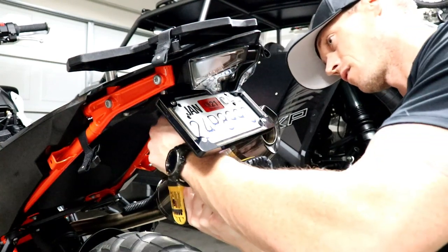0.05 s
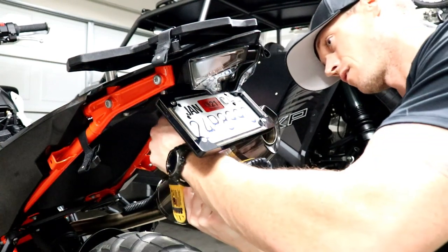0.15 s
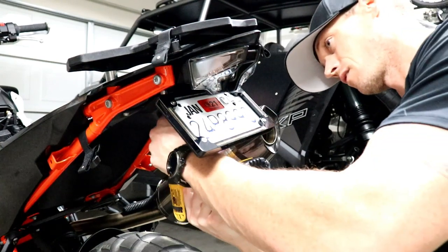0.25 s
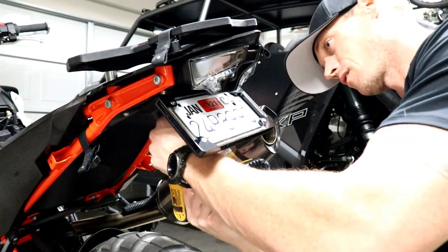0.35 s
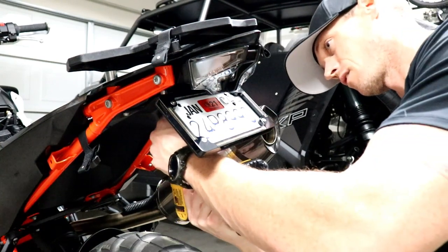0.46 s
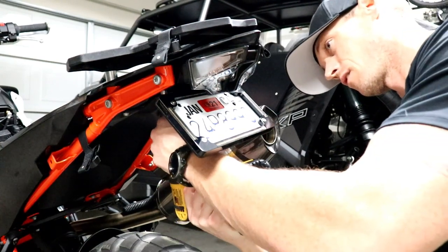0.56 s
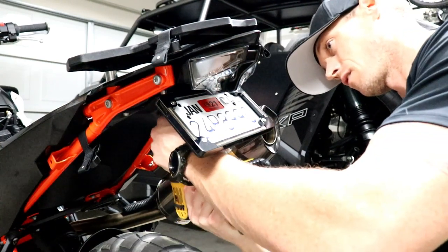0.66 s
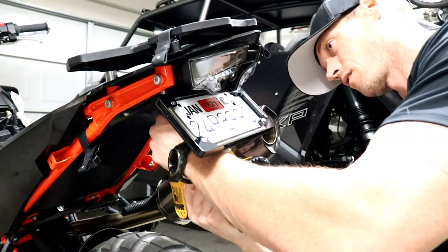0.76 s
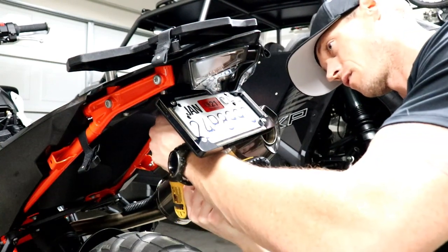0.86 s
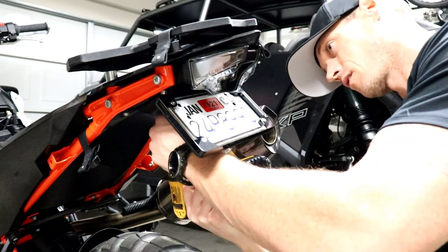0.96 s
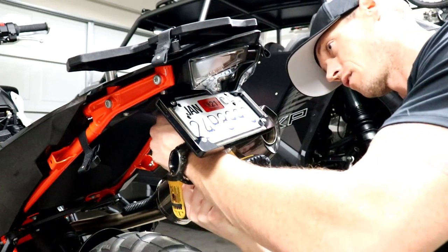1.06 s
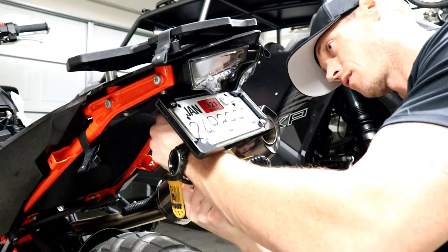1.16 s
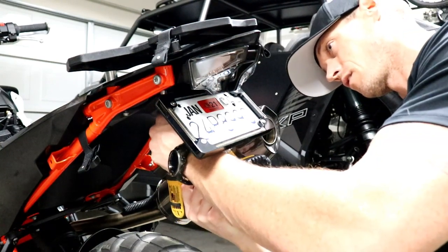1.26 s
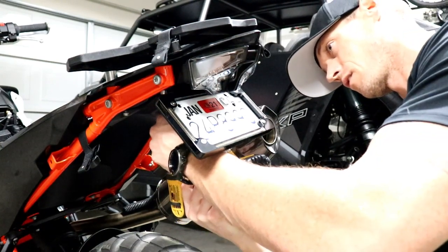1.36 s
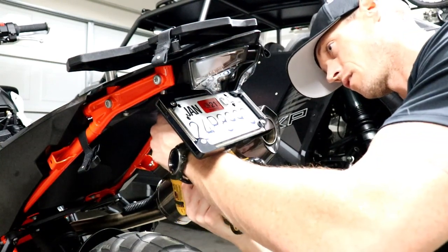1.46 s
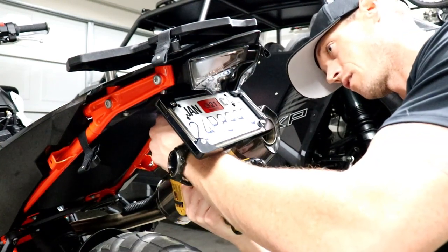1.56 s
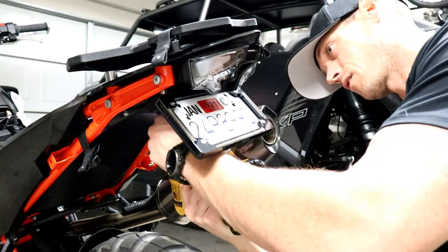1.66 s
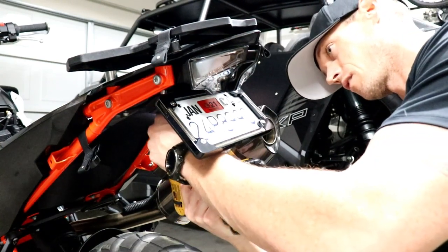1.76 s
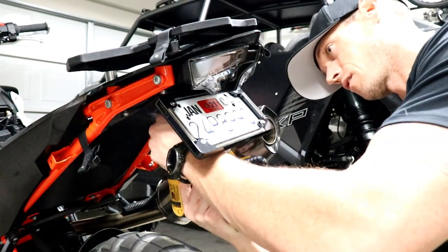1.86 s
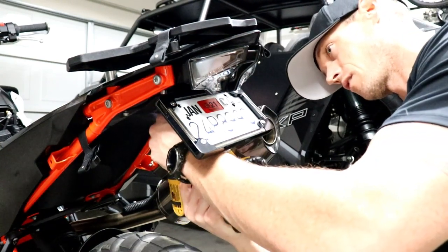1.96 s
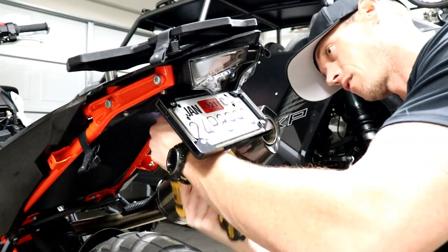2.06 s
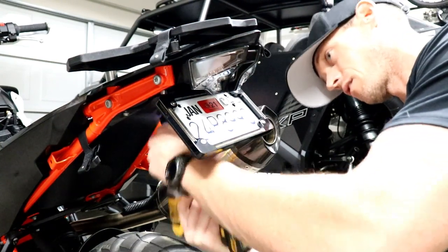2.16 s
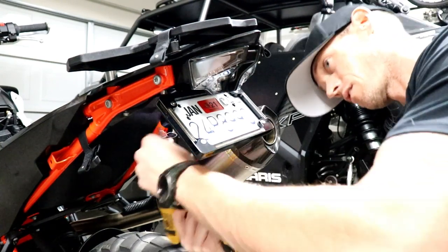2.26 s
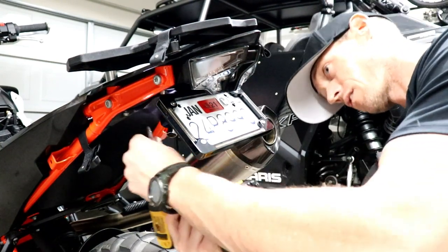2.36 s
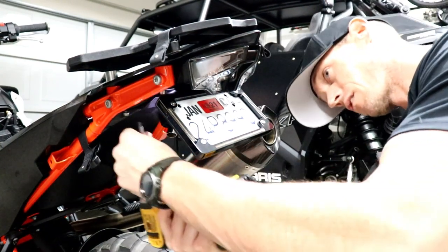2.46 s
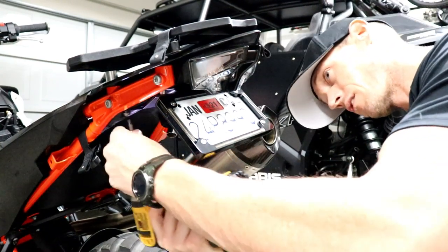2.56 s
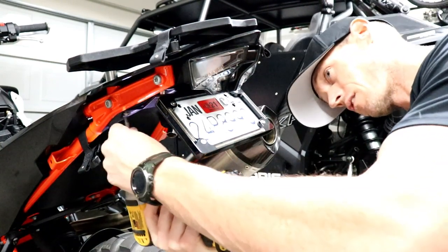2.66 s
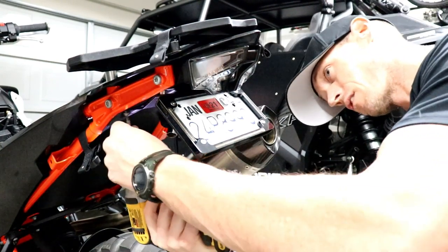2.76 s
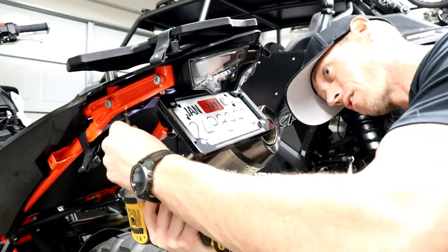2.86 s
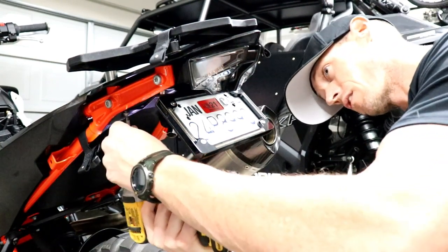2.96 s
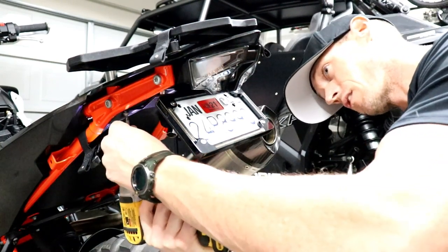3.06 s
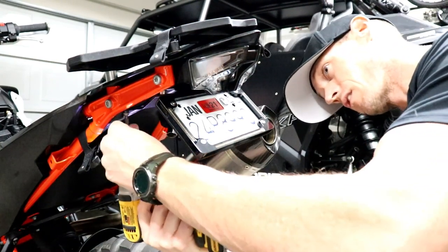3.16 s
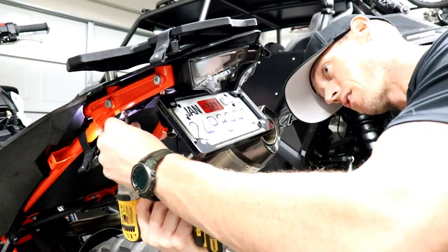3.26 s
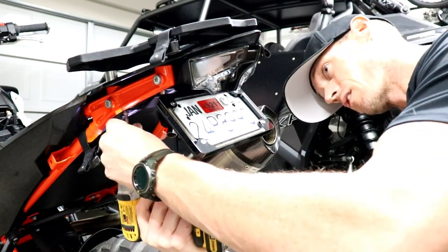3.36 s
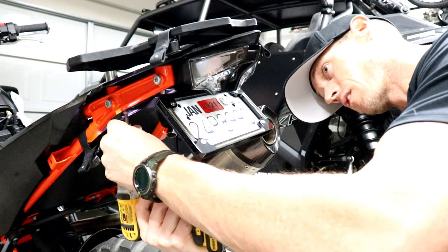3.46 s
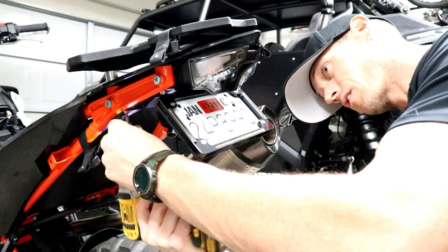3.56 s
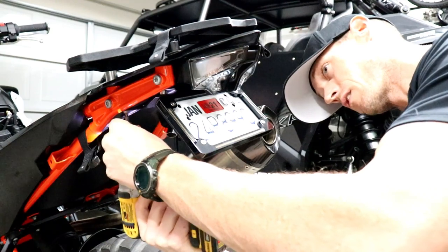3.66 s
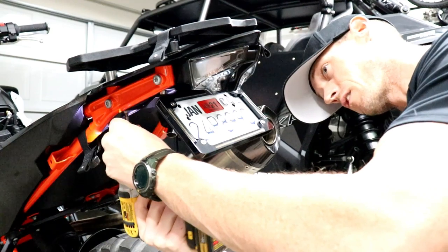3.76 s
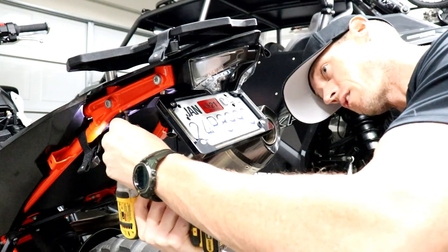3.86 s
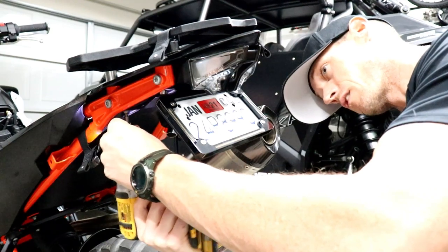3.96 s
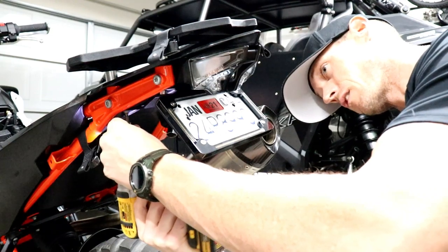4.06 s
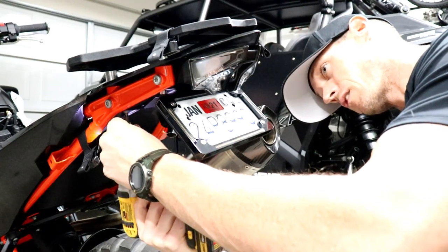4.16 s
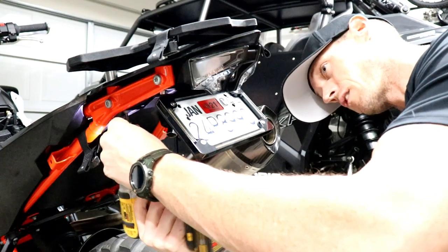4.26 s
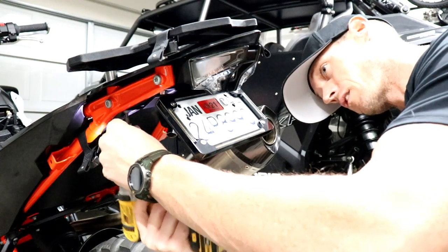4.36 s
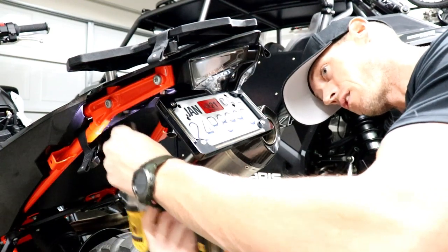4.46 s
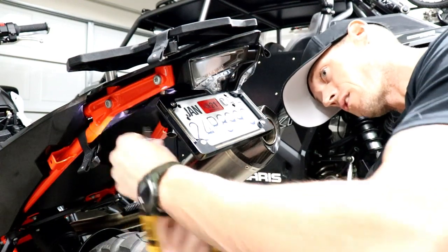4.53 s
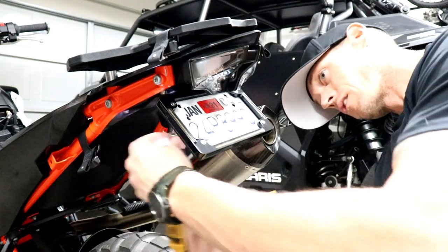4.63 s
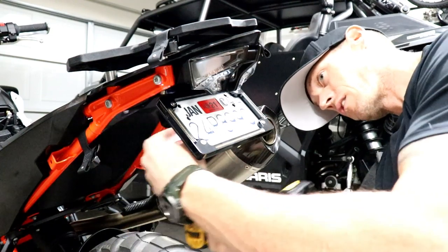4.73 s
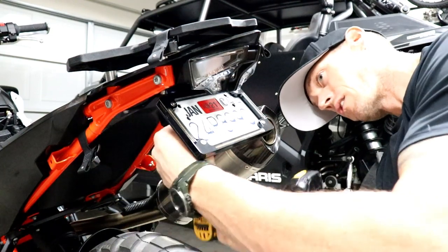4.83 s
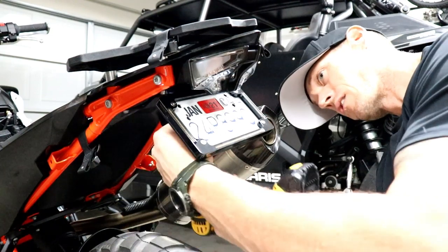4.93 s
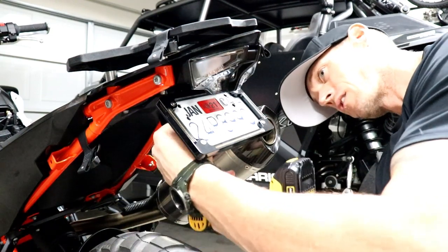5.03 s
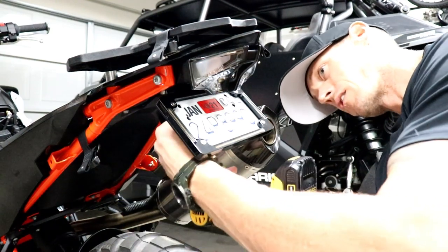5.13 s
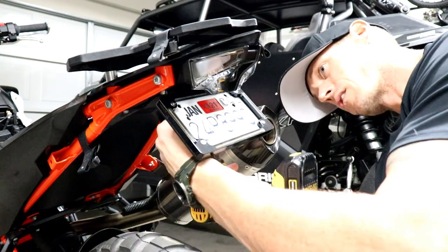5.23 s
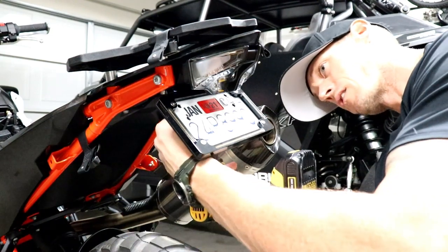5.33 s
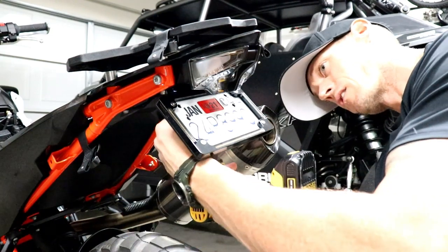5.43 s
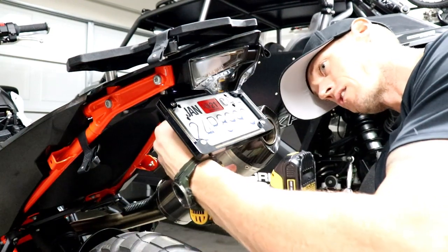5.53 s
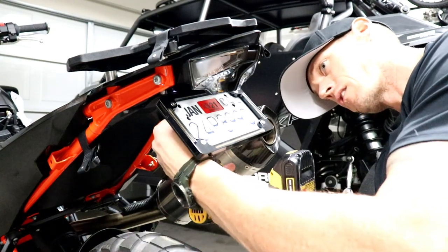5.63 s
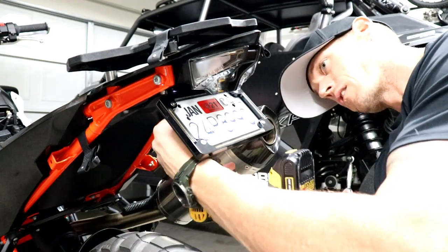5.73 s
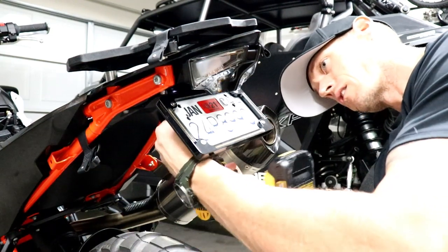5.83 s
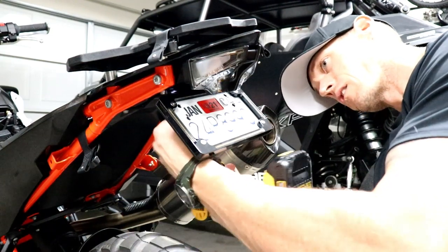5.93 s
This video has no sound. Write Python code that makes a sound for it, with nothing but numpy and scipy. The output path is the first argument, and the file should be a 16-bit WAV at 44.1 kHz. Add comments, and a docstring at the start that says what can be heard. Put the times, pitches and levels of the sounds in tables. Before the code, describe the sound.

Close by in a garage, a socket clicks lightly on a steel and plastic vehicle frame. A cordless impact driver turns a bolt slowly with a soft whir and thin whine, then hammers in one short, loud burst. After more clicks, a second bolt squeals faintly and is hammered in quick bursts that slightly overload the microphone. A few light knocks follow.

```python
"""First come light clicks of a socket on a steel and plastic vehicle frame, close by in a garage.
Then a cordless impact driver turns a bolt slowly: its gears whir and its motor control whines thinly.
Its hammer strikes in loud bursts that shake the frame and overload the microphone input.
A second bolt squeals as it tightens and is hammered too. Socket and bolt click in between and after."""
import sys
import numpy as np
from scipy import signal
from scipy.fft import rfft, irfft
from scipy.io import wavfile
from scipy.ndimage import uniform_filter1d

SR = 44100
rng = np.random.default_rng(int(sys.argv[2]) if len(sys.argv) > 2 else 0)


def transcribe(u):
    """Save the signal u as a 16-bit wav file named by the first command-line argument.

    u: samples, shape (n,) or (channels, n), limited to [-1, 1]; the rate is SR.
    q: integer samples, one column per channel.
    """
    v = np.clip(np.atleast_2d(u).T, -1, 1)
    q = np.round(v * 32767).astype(np.int16)
    wavfile.write(sys.argv[1], SR, q)


N = 264159
BANDS_HZ = 25 * 2 ** np.arange(0, 9.5, 1 / 3)


# Hammer hitting anvil, bounces included: t/s, level/dB, clatter length factor
HAMMER_BLOWS = [(1.8455, -8, 1.5), (1.8538, 5.5, 0.66), (1.8612, 7, 1.2), (1.8819, 2.5, 0.67),
                (1.8888, 11, 1), (1.912, 4, 2.75), (1.9395, 6, 1.12), (1.9557, -4, 2.1), (1.9671, 1, 1.03),
                (1.9824, -4.5, 1.7), (3.6635, 5.5, 1.26), (3.6719, -1.5, 1.57), (3.684, -8, 3),
                (3.702, 3, 1.77), (3.7084, -1.5, 1.24), (3.7224, -3, 1.85), (3.7438, 2, 1.84),
                (3.7514, -1, .9), (3.765, -4, 2.9), (3.7901, -1.5, 2.4), (3.8017, 3.5, 1.1),
                (3.8162, -2, 0.69), (4.0832, -1.5, 2), (4.091, 11, 0.58), (4.114, 3.5, 1.9),
                (4.1371, 8.5, 1.2), (4.1534, 0, 1.8), (4.162, 5, 1.37), (4.1766, 4.5, 0.61),
                (4.2672, -5.5, 0.75), (4.291, -2, 1.6), (4.2972, 7.5, 1.3), (4.3219, 1.5, 2.3),
                (4.344, 5, 2.85), (4.3679, -5.5, 6.1), (4.3754, -14, 1.8), (4.3932, 0.5, 0.99),
                (4.4036, -8, 0.37)]
# Broad resonances of the bracket holding the second bolt: f/Hz, width/Hz, level/dB
BRACKET_PEAKS = [(887, 51, 2.5), (3050, 180, -3), (5010, 450, 2)]

def hammer():
    """Each blow shakes tool and frame; harder blows have a brighter crack."""
    thud, panel, bracket, ringing = -21.5, -12, -10.5, -26.5   # dB relative to the blow
    hits = [(s, db, thud, panel, bracket, -15 + .4 * db, length, ringing)
            for s, db, length in HAMMER_BLOWS]
    blows = clatter(hits, level_db=-7.5, column=1)
    second_bolt = np.arange(N) > 3 * SR
    bracket_sound = resonances(blows * second_bolt + 1e-18, BRACKET_PEAKS, flicker_db=2.5)
    return blows + bracket_sound + frame(hits, spread_db=4.0)


# Light clicks and knocks of socket and bolt, and a jolt of the motor:
# t/s, level/dB, thud/dB, panel/dB, crack/dB
LIGHT_KNOCKS = [(0.0295, -39, -1, 1, -7), (0.206, -56, -1, 2, -6), (0.2213, -47, 1, 0, 1.5),
                (0.2274, -48.5, -9, 8, -17), (0.287, -50.5, 0, 1, -19), (0.3564, -56, -14, -6, -26),
                (0.3657, -47.5, -22, 2, -26), (0.4304, -44.5, 8.5, -6, -2), (0.4555, -51.5, -3, 0, -24),
                (0.523, -37.5, -29, -13, -11), (0.5535, -21, -41, -19, -14.5), (0.757, -32, -6, -5, -11),
                (0.7677, -24, -4, -9.5, -19), (1.1965, -12, -23, -7.5, -24), (1.2175, -28, -11, 2, -10),
                (1.2384, -29, -9.5, 5, -27), (1.7755, -48, -14, -2.5, -16), (1.7887, -39, -20.5, -2, -11.5),
                (1.8016, -34, -25.5, -4.5, -28), (1.8137, -32, -34, -18, -41),
                (1.8218, -26.5, -28, -17, -34), (1.8278, -23, -18, -14, -15),
                (2.6395, -67, -15, 4.5, -13.5), (2.665, -43.5, -31, -14, -32), (2.6984, -64, -11, 9, -15),
                (2.8261, -44, -8, -1.5, -5), (2.8726, -43, -6, -7, -9), (2.8808, -40, -14.5, 2, -9),
                (2.9644, -61.5, 8, 15, -16), (2.9982, -53, 7.5, 8, -21), (3.0114, -49, -6.5, 4.5, -19),
                (3.056, -52.5, -8, -5, -22), (3.0664, -51.5, -1, 2.5, -19.5), (3.1214, -53, 5, -10.5, -26),
                (3.1299, -56.5, 10, 8.5, -21), (3.1744, -64, 9, 20.5, -7), (3.2338, -46, 1, 1.5, -7),
                (3.2425, -33, -6, 11, -12), (3.2582, -22, -10, -11, -18.5),
                (3.3004, -21.5, -20, -18.5, -11.5), (5.2148, -62.5, -10, 4.5, -6),
                (5.2214, -55.5, -29.5, 5.5, -22), (5.3833, -20.5, -43, -24, -23),
                (5.687, -16.5, -23.5, -14.5, -29), (5.8364, -29.5, -9.5, -11.5, -27),
                (5.8577, -38.5, -17, 5, -4), (5.872, -23, -41, 4.5, -21), (5.9395, -31, -18, -22, -32)]

def light_knocks():
    """Each click, knock or jolt briefly shakes the frame, and the bracket moves with the panel."""
    length, ringing_db = .75, -22
    hits = [(s, db, thud, panel, -6.5 + .53 * panel, crack, length, ringing_db)
            for s, db, thud, panel, crack in LIGHT_KNOCKS]
    return clatter(hits, level_db=-1.5, column=2) + frame(hits, spread_db=3.5)


# Where thud, panel, bracket, anvil (two edges) and steel crack sound: f/Hz
PART_PITCHES = [450, 950, 1700, 2700, 3600, 5500]

def strength(hit, hz):
    """How strong a hit is at a frequency, from how hard it strikes each part."""
    db, thud, panel, bracket, crack = hit[1:6]
    part_db = [thud, panel, bracket, 0, 0, crack]
    return from_db(db + np.interp(np.log(hz), np.log(PART_PITCHES), part_db))


# Noise of a hit: f/Hz, blow level/dB, knock level/dB, fade/s (time to drop 60 dB at length factor 1)
CLATTER_BANDS = [(60, -25.5, -23, 0.045), (200, -12.5, -12.5, 0.054), (462, -1.5, -1, 0.1),
                 (880, 1, 1, 0.059), (1520, 6.5, 1.5, 0.037), (2300, 2.5, 2.5, .04), (3300, 2, -8.5, 0.03),
                 (3880, -2, -17, 0.026), (7450, -2, -4.5, 0.037), (10800, 5.5, -13, 0.027),
                 (14900, 0.5, -7, 0.022)]

def clatter(hits, level_db, column):
    """The many close notes of frame and tool blur into noise that fades band by band."""
    white = rng.standard_normal((2, N))
    t = np.arange(SR // 6) / SR
    envelope = np.full((len(BANDS_HZ), N + len(t)), 1e-18)
    fade_s = at_hz(CLATTER_BANDS, BANDS_HZ, column=3)
    colour = from_db(level_db + at_hz(CLATTER_BANDS, BANDS_HZ, column))
    rise = 1 - np.exp(-t / 0.00049)   # the force needs a moment to build
    for hit, chance in zip(hits, rng.standard_normal((len(hits), len(BANDS_HZ)))):
        start, length = round(hit[0] * SR), hit[6]
        gain = colour * strength(hit, BANDS_HZ) * from_db(2.0 * chance)
        decay = from_db(-60 * t / (length * fade_s[:, None]))
        envelope[:, start:start + len(t)] += rise * gain[:, None] * decay
    return sum(band(envelope[k, :N] * white[k % 2], hz) * np.sqrt(SR / hz)
               for k, hz in enumerate(BANDS_HZ))


# Clearest notes of frame and tool: f/Hz, level/dB, fade/s
FRAME_NOTES = [(324, -1.5, 0.053), (536.4, -1, 0.088), (672, -8, 0.18), (827, 5, 0.45), (917, 6.5, 0.052),
               (1030, -5.5, 0.027), (1140, -1, 0.091), (1450, -8, 0.36), (1750, -3, 0.36),
               (2110, -1.5, 0.098), (2236, -7, 0.31), (2285, -19.5, 0.046), (2513, -14.5, 0.027),
               (2820, -10.5, 0.065), (3220, 0.5, 0.045), (3260, -9, 0.077), (4860, -14, 0.079),
               (4940, -15.5, 0.05)]

def frame(hits, spread_db):
    """Every hit rings the same notes, each time in a different mix."""
    hz, db, fade_s = np.transpose(FRAME_NOTES)
    clicks = np.full((len(hz), N), 1e-18)
    for hit, chance in zip(hits, rng.standard_normal((len(hits), len(hz)))):
        start, ringing_db = round(hit[0] * SR), hit[7]
        clicks[:, start] = strength(hit, hz) * from_db(ringing_db + db + spread_db * chance)
    return sum((-1) ** k * ring(clicks[k], hz[k], fade_s[k]) for k in range(len(hz)))


# Slow turning, one list per bolt: t/s, level/dB, treble/dB
SLOW_TURNS = [
    [(.521, -51, 1), (.68, -50.5, -2), (.82, -41.5, -8), (.95, -45, 1), (1.25, -41.5, -1.5),
     (1.42, -39, -3), (1.5, -38, 0.5), (1.523, -41, -3), (1.535, -55.5, 3)],
    [(3.3, -52.5, 5.5), (3.42, -48.5, -0.5), (3.47, -43, 8), (3.53, -36, 5), (3.61, -36.5, 4),
     (3.665, -26.5, 9)],
]
# The motor races up just before a burst: end t/s, end level/dB
RUN_UPS = [(1.85, -23), (4.088, -8.5), (4.298, -10)]
# Tone colour of the gears: f/Hz, level/dB
GEAR_COLOUR = [(35, -56), (60, -18.5), (139, -14), (220, -19.5), (385, -8), (627, -6.5), (1200, -4),
               (1910, -7.5), (3190, -7), (4120, -15), (4960, -16), (7200, -26.5), (8090, -30.5),
               (8670, -28), (15500, -33.5)]
# Resonances of the gear housing: f/Hz, width/Hz, level/dB
HOUSING_PEAKS = [(360, 98, -5), (1170, 150, -7.5), (2400, 200, -8.5), (3160, 800, -4)]

def motor():
    """Gear teeth and thread catch in tiny clicks that merge into a whir, bright when the motor races."""
    whir = grains(per_s=4600, spread_db=4.0, hiss_db=-7.0, spectrum=GEAR_COLOUR)
    whir += resonances(whir, HOUSING_PEAKS, flicker_db=5.0)
    treble = signal.sosfilt(signal.butter(1, 1800, "high", fs=SR, output="sos"), whir)
    rise_s, rise_db, treble_db = 0.034, 38, 5.5
    runs = SLOW_TURNS + [[(s - rise_s, db - rise_db, treble_db), (s, db, treble_db)] for s, db in RUN_UPS]
    level = from_db(in_time(runs, column=1))
    brightness = from_db(in_time(runs, column=2))
    return level * (whir - treble + brightness * treble)


# Stages of a lightly pressed trigger: start t/s, end t/s, tone level/dB, octave level/dB
WHINE_STAGES = [(.522, .77, -61, -72.5), (.77, 1.53, -65, -64.5), (1.53, 1.83, -58, -63.5),
                (3.24, 3.31, -73, -76), (3.31, 3.455, -68, -69)]

def whine(hz, flutter):
    """The motor control switches at a steady rate: a tone and two overtones that flutter in strength."""
    phase = 2 * np.pi * hz * np.arange(N) / SR
    wobble = 1 + flutter * drift(smoothing=.995)
    stages = [[(s, tone, octave, octave - 13) for s in (start, end)]
              for start, end, tone, octave in WHINE_STAGES]
    tones = sum(uniform_filter1d(from_db(in_time(stages, k)), size=400) * np.sin(k * phase)
                for k in (1, 2, 3))
    return np.sqrt(2) * wobble * tones


# The second bolt's thread as it tightens: t/s, f/Hz, level/dB
SQUEAL_PATH = [
    [(3.462, 800, -49), (3.49, 930, -39), (3.51, 940, -47.5), (3.535, 985, -33.5), (3.56, 1020, -51.5),
     (3.61, 1000, -45), (3.63, 1095, -39), (3.648, 1000, -30), (3.66, 950, -34.5)],
]
# Its tone and two overtones: level/dB
SQUEAL_MIX = (-1, 3, 2.5)

def squeal(jitter):
    """The thread sticks and slips, making a tone whose pitch trembles."""
    hz = in_time(SQUEAL_PATH, column=1) * (1 + jitter * drift(smoothing=.99))
    phase = 2 * np.pi * np.cumsum(hz) / SR
    tones = sum(from_db(db) * np.sin(k * phase) for k, db in enumerate(SQUEAL_MIX, 1))
    return np.sqrt(2) * from_db(in_time(SQUEAL_PATH, column=2)) * tones


# Small steel parts with one note each: t/s, level/dB, f/Hz, fade/s
STEEL_PINGS = [(1.1985, 1, 1895, 0.009), (2.664, -53, 3025, 0.033), (3.246, -26.5, 841, 0.047),
               (5.385, -45, 2786, 0.048)]
# Knocks on a loose part: t/s, level/dB
LOOSE_KNOCKS = [(5.688, -31), (5.872, -27.5)]
# Notes of that part: f/Hz, level/dB, fade/s
LOOSE_NOTES = [(849, 4.5, 0.056), (904, 0.5, 0.062), (1275, -10.5, 0.068), (1550, -11, 0.34),
               (1626, 5.5, 0.046), (1960, -9.5, 0.11), (2530, -2.5, 0.064)]

def pings():
    """Knocked parts ring and fade; the loose one sounds all its notes in an uneven mix."""
    out = np.zeros(N + SR)
    t = np.arange(SR // 2) / SR
    rise = 1 - np.exp(-t / .0015)
    notes = STEEL_PINGS + [(s, db + note_db + 1.6 * rng.standard_normal(), hz, fade_s)
                           for s, db in LOOSE_KNOCKS for hz, note_db, fade_s in LOOSE_NOTES]
    for (s, db, hz, fade_s), turn in zip(notes, rng.random(len(notes))):
        start = round(s * SR)
        tone = np.sin(2 * np.pi * (hz * t + turn))
        out[start:start + len(t)] += rise * from_db(db - 60 * t / fade_s) * tone
    return out[:N]


# Dull, grainy rubbing, with a brief swell of noise at 3.3 s; one list per stretch: t/s, level/dB
RUB_LEVELS = [
    [(0.18, -65), (0.286, -63), (0.52, -63)],
    [(2.82, -80), (2.884, -60), (3.006, -61), (3.26, -64), (3.3, -37)],
    [(5.83, -61), (5.858, -52.5), (5.918, -48), (5.99, -74.5)],
]
# Tone colour of the rubbing: f/Hz, level/dB
RUB_COLOUR = [(59, -37.5), (100, -8.5), (271, -5.5), (443, -4), (764, -31.5), (855, 0), (1920, -26.5),
              (3020, -17), (9000, -44), (11700, -76), (19800, -120)]

def rubbing():
    """Tiny clicks and hiss blend into a dull rub that swells and fades."""
    rub = grains(per_s=1500, spread_db=3.0, hiss_db=0, spectrum=RUB_COLOUR)
    return from_db(in_time(RUB_LEVELS, column=1)) * rub


# Echo of the garage: f/Hz, fade/s, level/dB
ECHO_BANDS = [(60, 0.71, -16), (200, .6, -5), (497, 0.52, -2.5), (1040, 0.51, -4), (3000, 0.65, -10.5),
              (5500, 0.62, -5), (7900, 0.49, -10), (11600, 0.47, -11), (15000, .22, -11.5)]

def garage(x, build_s):
    """Sound bounces off the walls in a dense echo that builds up, then fades band by band."""
    t = np.arange(SR) / SR
    white = rng.standard_normal((2, SR))
    tail = np.zeros(SR)
    for k, hz in enumerate(BANDS_HZ[:-1] * 2 ** (1 / 6)):
        db = at_hz(ECHO_BANDS, hz, column=2) - 60 * t / at_hz(ECHO_BANDS, hz)
        tail += from_db(db) * band(white[k % 2], hz)
    tail *= np.clip(t / build_s, 0, 1) / np.sqrt(0.031 * SR)
    return signal.fftconvolve(x, tail)[:N]


# Tone colour of the quiet garage: f/Hz, level/dB
AIR_COLOUR = [(20, -24.5), (40, -12.5), (80, -2.5), (160, -4.5), (280, -11), (500, -10), (800, -11.5),
              (1500, -19.5), (2800, -22.5), (4500, -29), (8000, -32.5), (15600, -34.5)]

def air(level_db):
    """A faint, low, steady hush fills the room."""
    return from_db(level_db) * coloured(rng.standard_normal(N), AIR_COLOUR)


def grains(per_s, spread_db, hiss_db, spectrum):
    """Dense uneven clicks over a hiss, in the colour of what they shake; rms 1."""
    sizes = from_db(spread_db * np.minimum(rng.exponential(1, N), 4)) * rng.choice([-1, 1], N)
    clicks = rms_one((rng.random(N) < per_s / SR) * sizes)
    hiss = from_db(hiss_db) * rng.standard_normal(N)
    return coloured(clicks + hiss, spectrum)


def resonances(x, peaks, flicker_db):
    """Pick out bands of a sound, each drifting to a new level about twenty times a second."""
    out = np.zeros(N)
    for hz, width, db in peaks:
        r, w = np.exp(-np.pi * width / SR), 2 * np.pi * hz / SR
        slow = np.interp(np.arange(N), np.arange(0, N + 2000, 2000), rng.standard_normal(N // 2000 + 2))
        peak = signal.lfilter([(1 - r * r) / 2, 0, (r * r - 1) / 2], [1, -2 * r * np.cos(w), r * r], x)
        out += from_db(db + flicker_db * slow) * peak
    return out


def ring(clicks, hz, fade_s):
    """Each click starts a fading tone of the click's height."""
    r, w = from_db(-60 / (fade_s * SR)), 2 * np.pi * hz / SR
    return signal.lfilter([0, np.sin(w)], [1, -2 * r * np.cos(w), r * r], clicks)


def drift(smoothing):
    """A randomly wandering curve; rms 1."""
    return rms_one(signal.lfilter([1], [1, -smoothing], rng.standard_normal(N)))


def coloured(x, spectrum):
    """Give white noise a tone colour; rms 1."""
    hz = np.maximum(np.arange(N // 2 + 1) * SR / N, 1)
    return rms_one(irfft(rfft(x) * from_db(at_hz(spectrum, hz)), N))


def band(x, hz):
    """Keep a third of an octave around a frequency."""
    edges = [hz / 2 ** (1 / 6), hz * 2 ** (1 / 6)]
    return signal.sosfilt(signal.butter(2, edges, "band", fs=SR, output="sos"), x)


def in_time(spans, column):
    """Join one column's points into a curve over time; -150 outside the spans."""
    t, out = np.arange(N) / SR, np.full(N, -150.)
    for rows in map(np.array, spans):
        inside = (t >= rows[0, 0]) & (t <= rows[-1, 0])
        out[inside] = np.interp(t[inside], rows[:, 0], rows[:, column])
    return out


def at_hz(table, hz, column=1):
    """Read between a table's rows, with octaves evenly spaced."""
    rows = np.array(table)
    return np.interp(np.log(hz), np.log(rows[:, 0]), rows[:, column])


def from_db(db):
    """Decibels to gain."""
    return 10 ** (np.asarray(db) / 20)


def rms_one(x):
    """Scale to an average strength (rms) of 1."""
    return x / np.sqrt(np.mean(x ** 2) + 1e-20)


def scene():
    """Tool and frame near by, the garage around them."""
    near = hammer() + light_knocks() + motor() + rubbing() + pings() + squeal(jitter=.012)
    hush = air(level_db=-67)
    echo = garage(near, build_s=0.0009)
    return (near + echo + whine(hz=3925, flutter=0.13) + hush)[None]


def record(dry):
    """Loud peaks overload the input and are squashed; the highest treble is cut."""
    ceiling, hardness, cutoff_hz = .97, 5.0, 15700
    clipped = dry / (1 + np.abs(dry / ceiling) ** hardness) ** (1 / hardness)
    low_pass = signal.ellip(10, .5, 60, cutoff_hz, fs=SR, output="sos")
    return np.clip(signal.sosfilt(low_pass, clipped), -1, 1)


dry = scene()
out = record(dry)
transcribe(out)
```